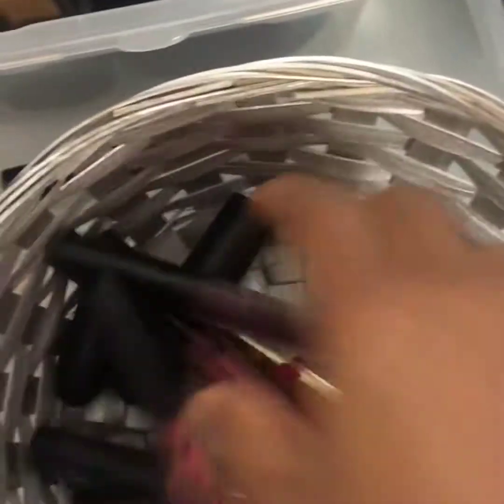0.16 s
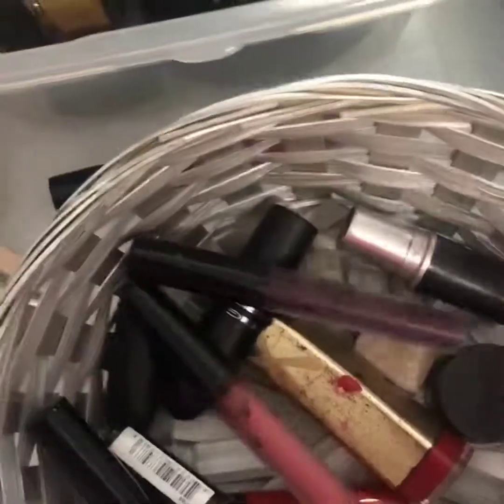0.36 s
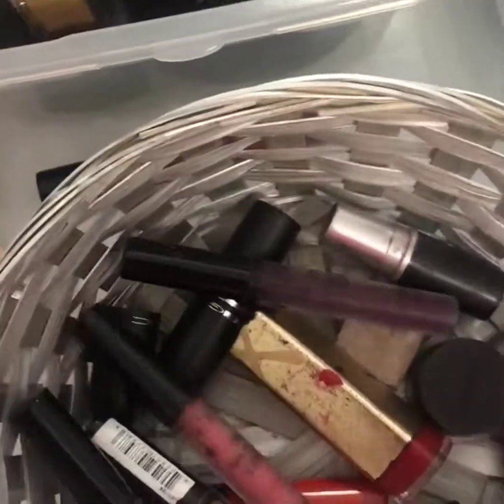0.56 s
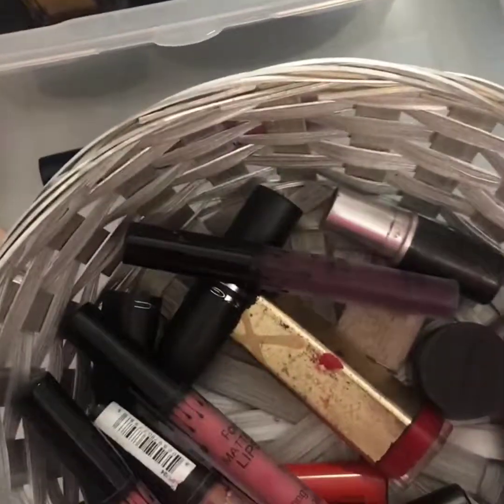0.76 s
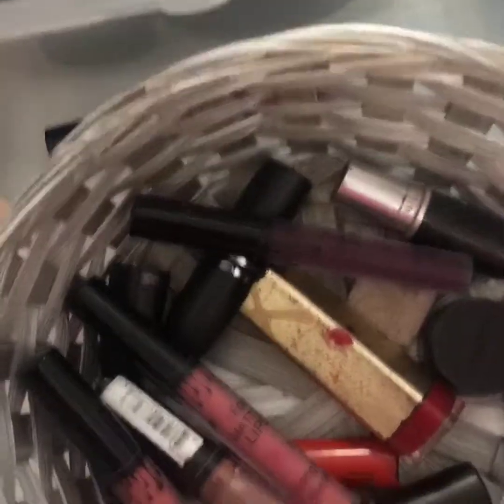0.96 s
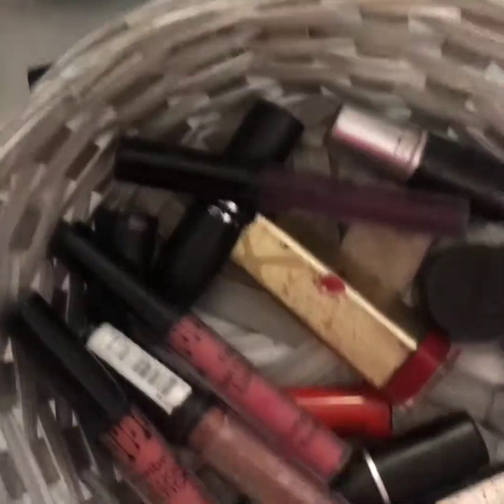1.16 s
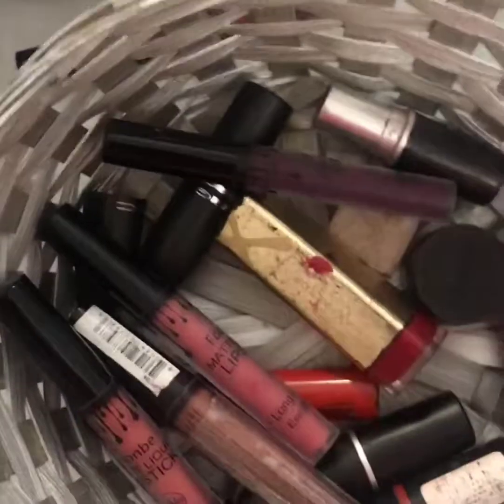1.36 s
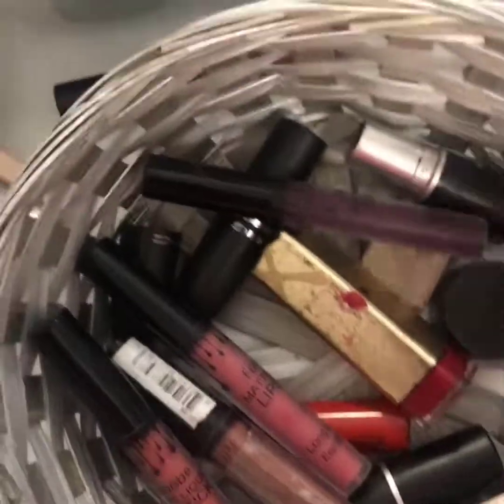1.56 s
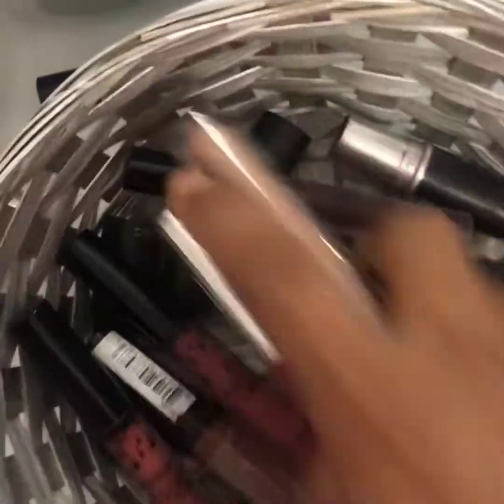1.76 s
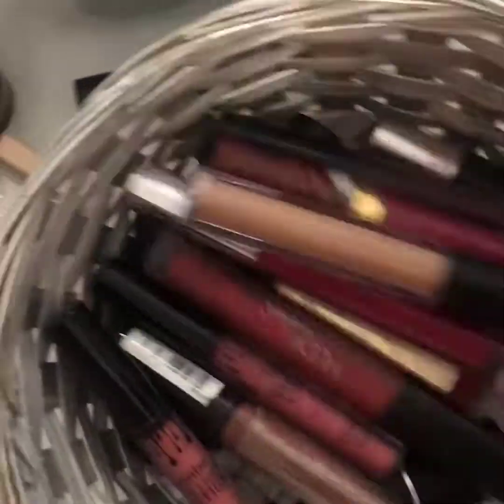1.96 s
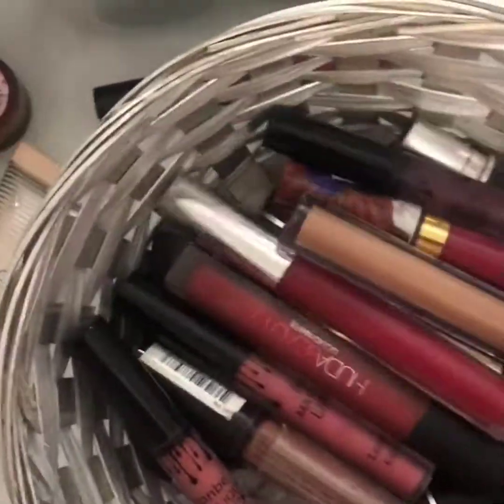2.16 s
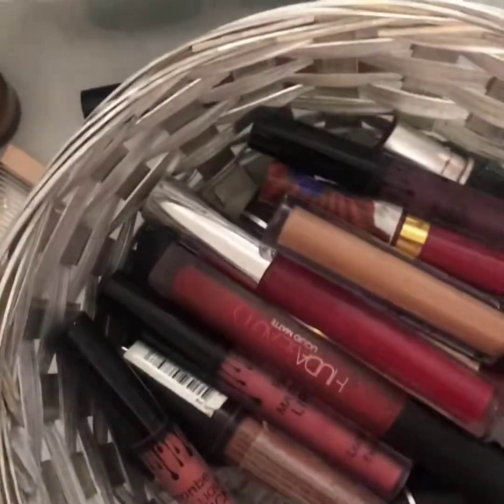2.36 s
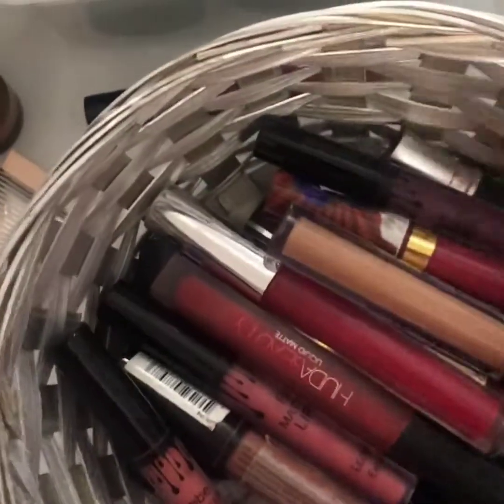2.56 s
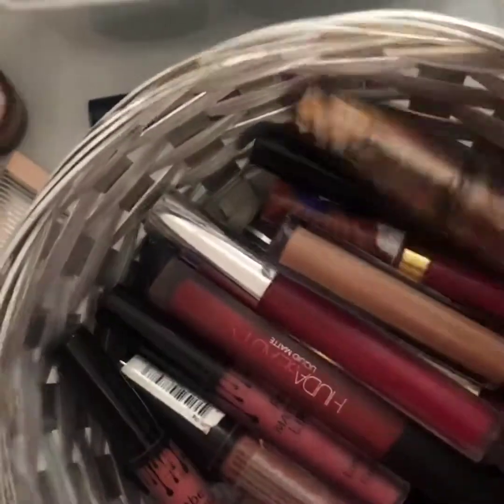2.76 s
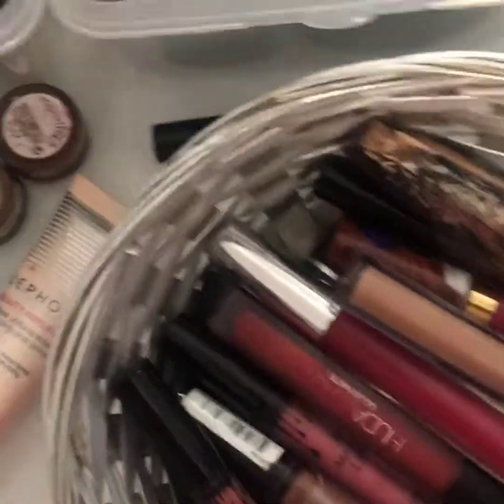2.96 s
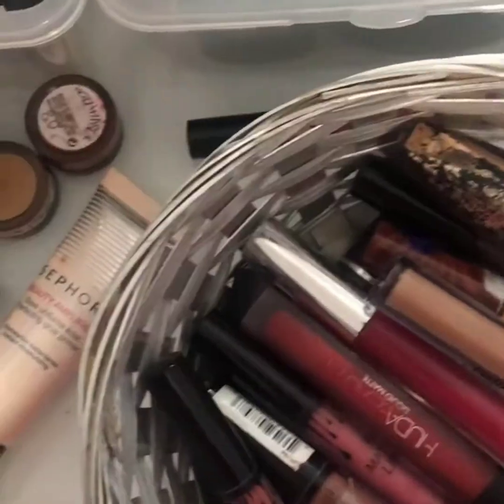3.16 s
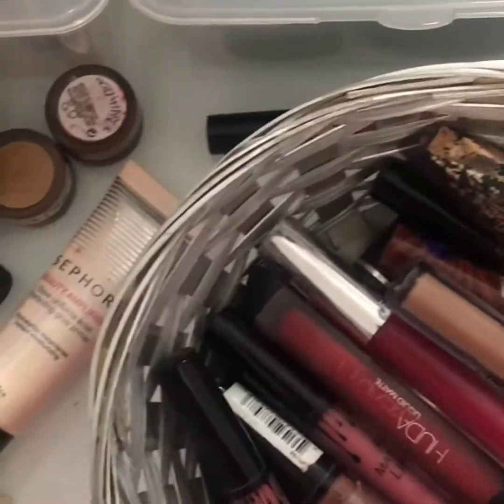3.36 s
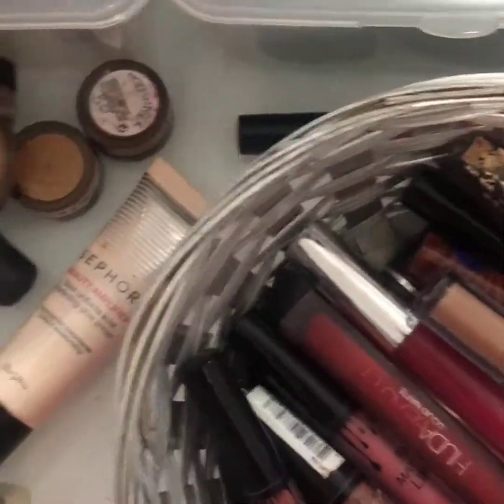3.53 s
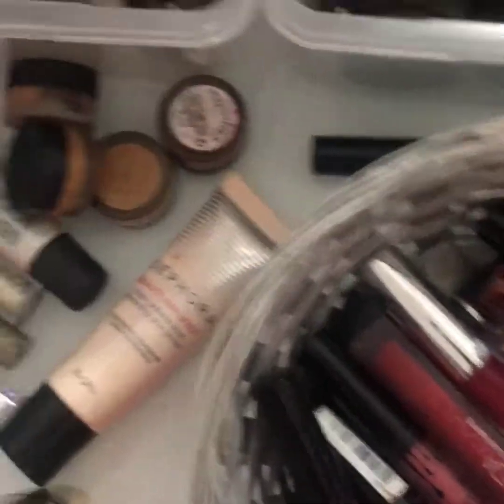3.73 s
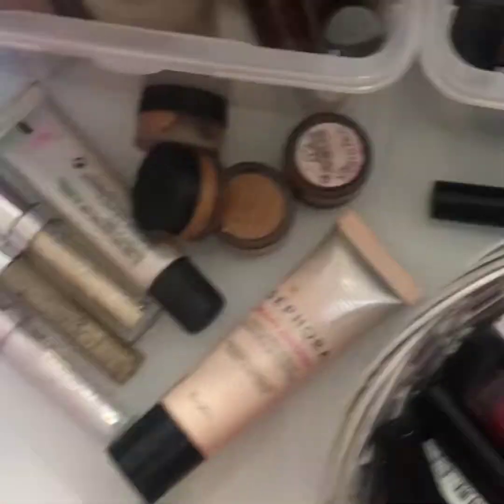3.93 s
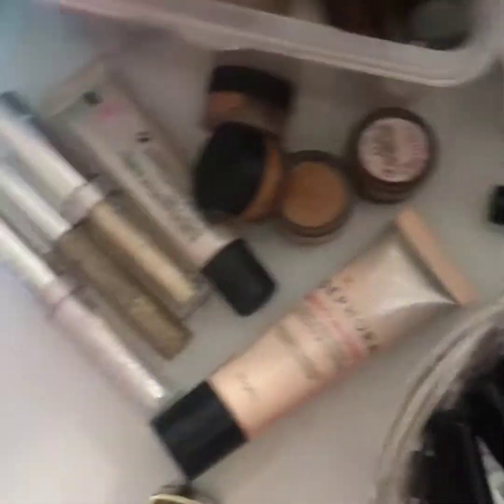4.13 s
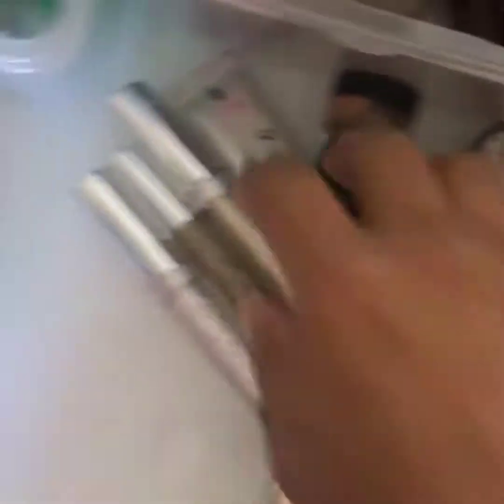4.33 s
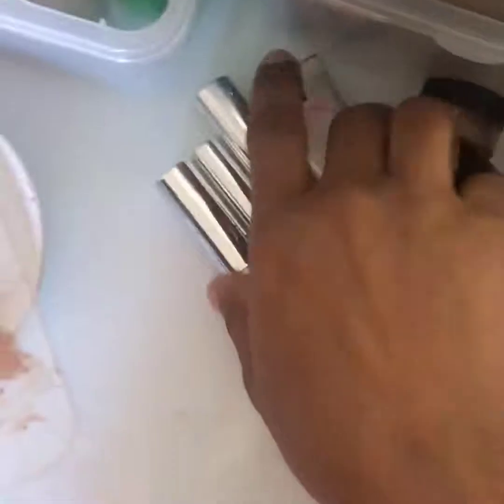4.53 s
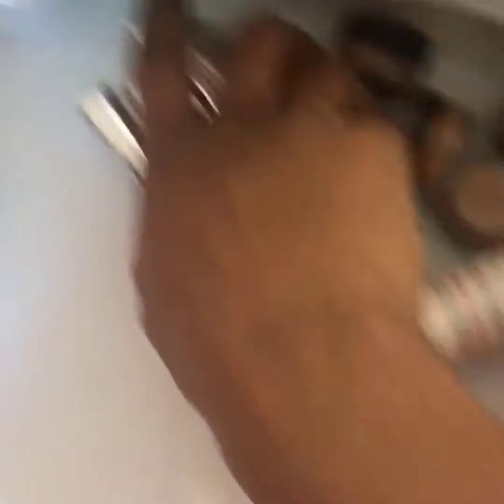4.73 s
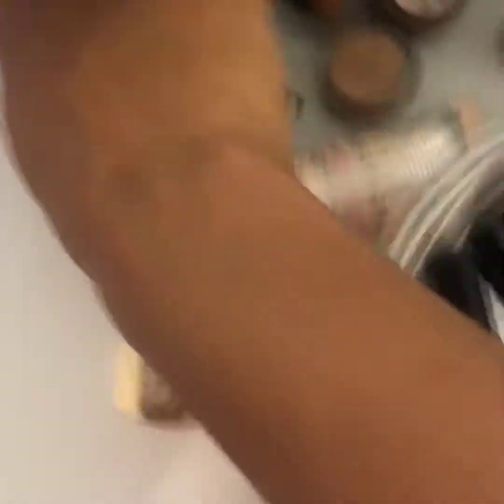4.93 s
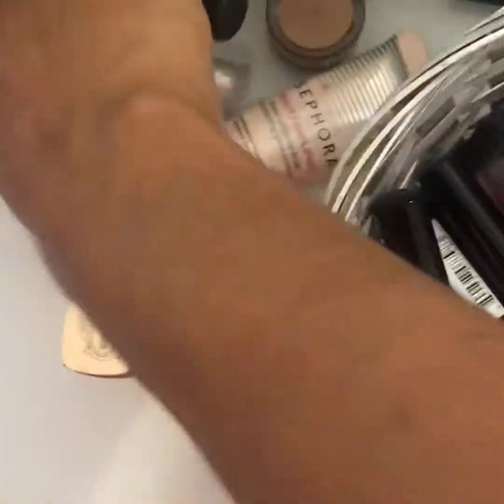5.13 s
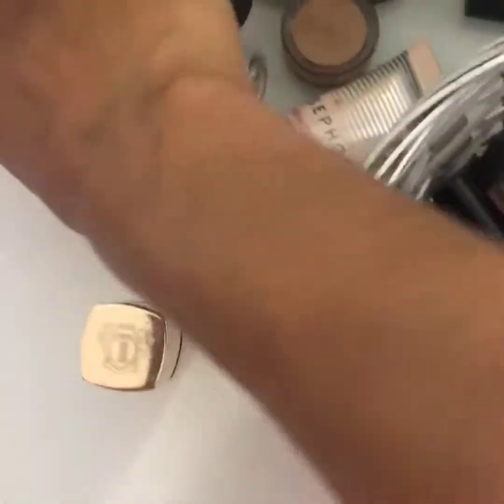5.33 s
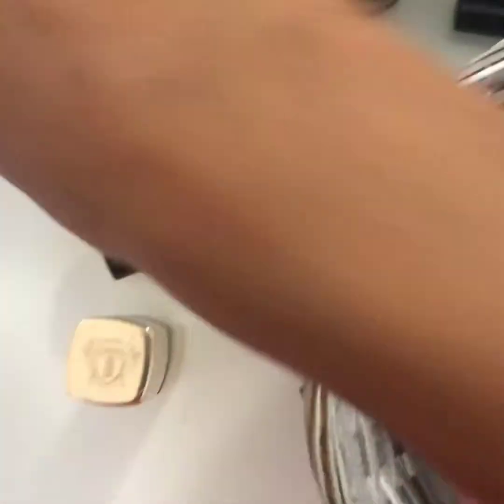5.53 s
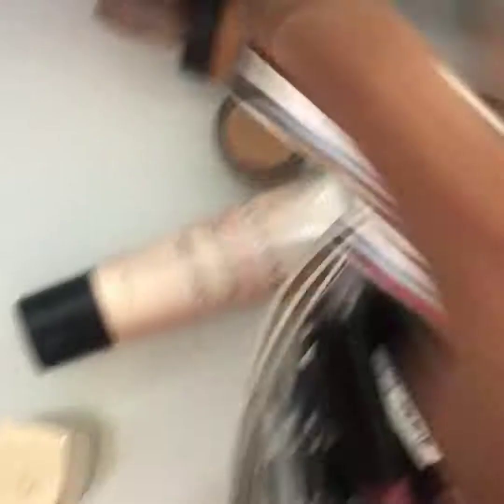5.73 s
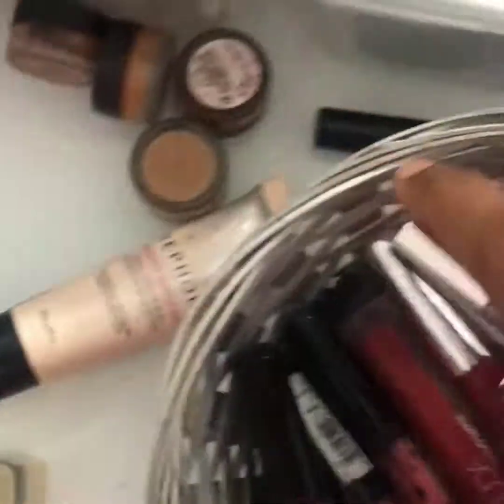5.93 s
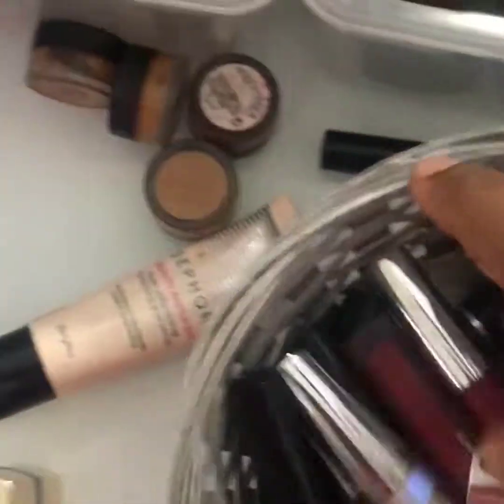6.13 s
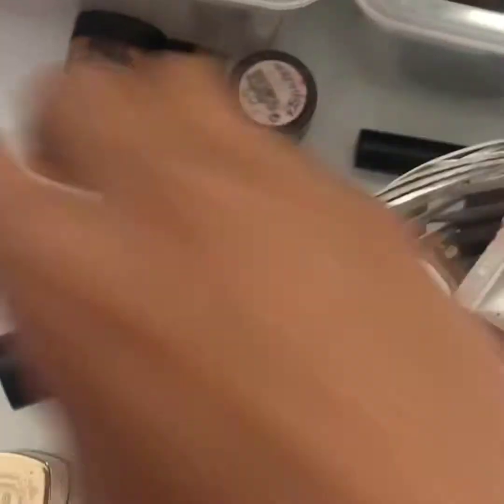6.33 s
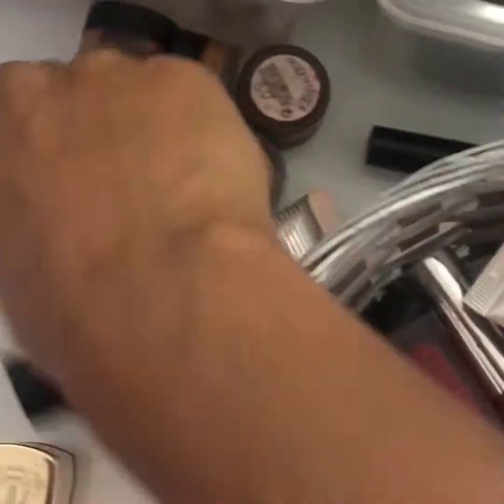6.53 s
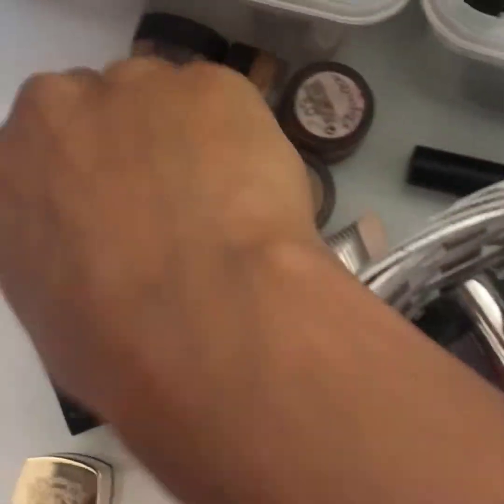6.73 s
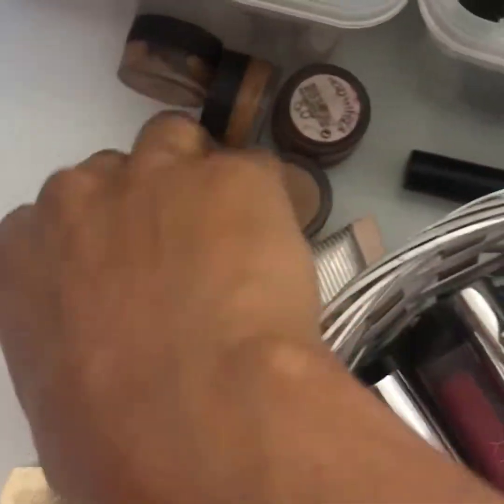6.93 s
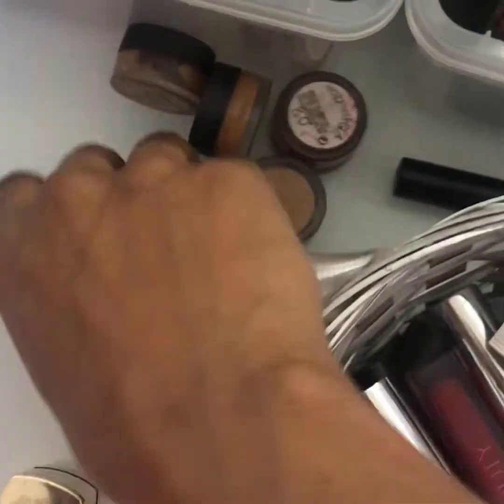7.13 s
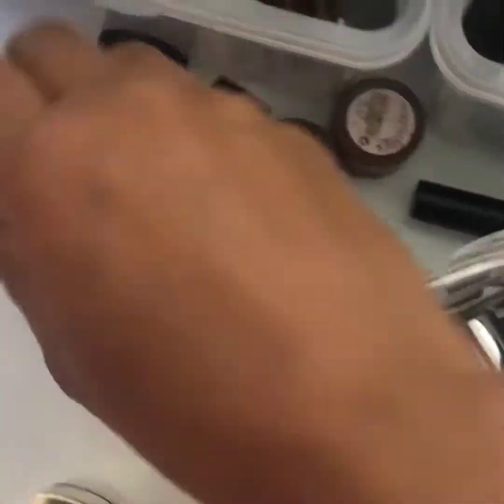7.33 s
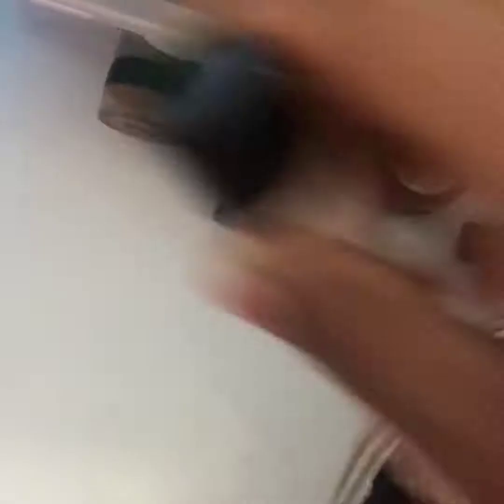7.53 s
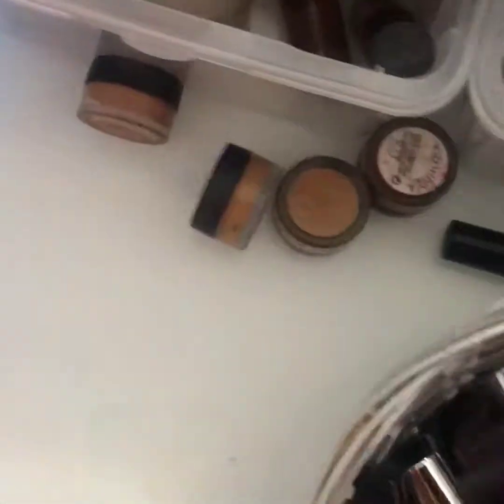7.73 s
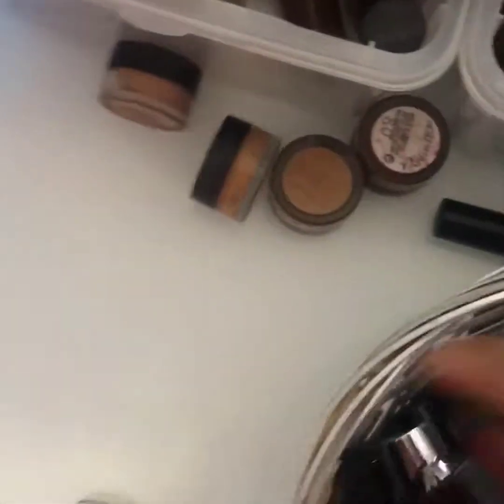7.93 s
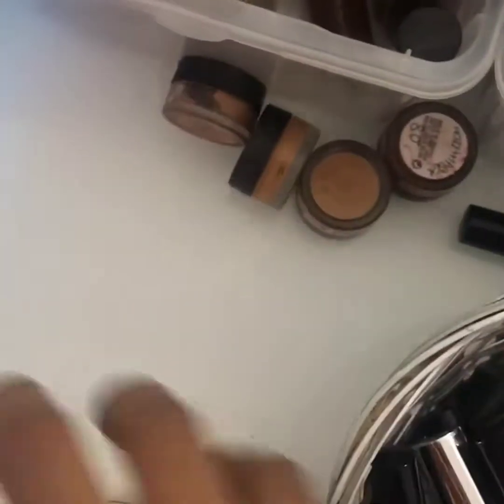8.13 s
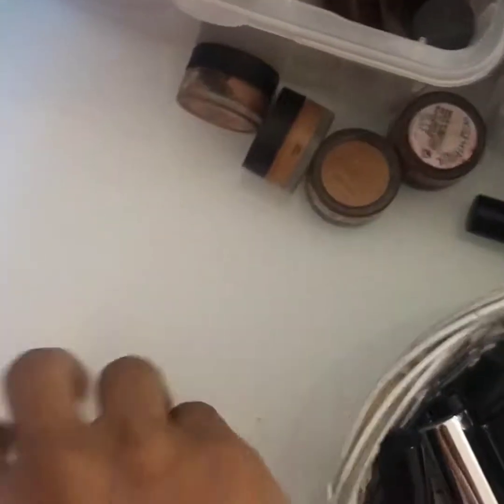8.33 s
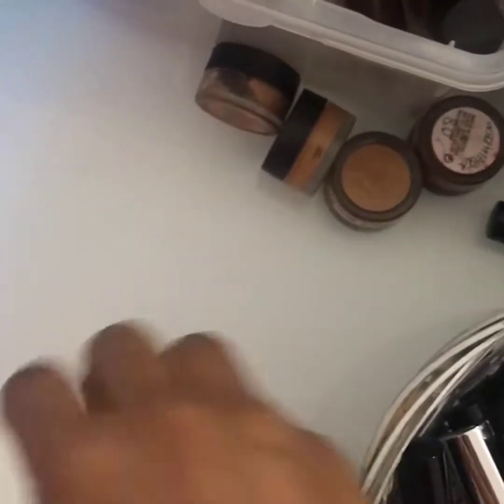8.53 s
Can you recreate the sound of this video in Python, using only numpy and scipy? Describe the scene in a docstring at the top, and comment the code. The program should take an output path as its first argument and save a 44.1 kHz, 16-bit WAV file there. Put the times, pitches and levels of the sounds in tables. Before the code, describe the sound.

Plastic lipstick and gloss tubes click and rattle against each other in a wicker basket from the start, heard close in a small room. More sharp, hollow knocks come around 0.8 to 1.2 seconds, with soft wicker thuds. The loudest handful clatters down at about 1.9 seconds, followed by shorter bursts near 2.8 and 4 seconds, each dying away in a brief rattle. From 4.5 to 5.9 seconds slim tubes slide and knock, quieter and damped, on a drawer bottom, with one bright crack near 4.9. Another handful lands loudly in the basket at about 6.1 seconds. Soft scraping and light taps in the drawer follow until 7.4. The last tubes fall near 7.9 seconds with a low thud, and a few small clicks settle by 8.2. Faint electrical hum and hiss run throughout, the hiss rising briefly after loud cracks.

```python
"""Plastic lipstick and gloss tubes are gathered from a drawer and dropped into a wicker basket.
Over mains hum and hiss in a small room, handfuls clatter for 4 s: each knock rings a hollow tube and
jolts the load into a fading rattle, wood and wicker thud, and the hiss steps up after loud cracks.
From 4.5 s slim gloss tubes slide and knock, damped, on the drawer bottom. A handful lands near 6.1 s,
the hand works quietly in the drawer again, and the last tubes fall near 7.9 s."""
import sys
import numpy as np
from scipy import signal
from scipy.fft import rfft, irfft
from scipy.io import wavfile

SR = 44100
rng = np.random.default_rng(int(sys.argv[2]) if len(sys.argv) > 2 else 0)


def store_wav(level_fs):
    """Save 16-bit WAV to argv[1]."""
    pcm = np.round(np.clip(np.atleast_2d(level_fs), -1, 1) * 32767)
    wavfile.write(sys.argv[1], SR, pcm.T.astype(np.int16))


N = 382788
T = np.arange(N) / SR

# impacts of tube on tube: t/s, relative blow level/dB, tube pitch f/Hz, relative crack level/dB
KNOCKS = [(0.0028, -13.5, 2450, 0), (0.0096, -14, 2660, -11.5), (0.0789, -27.5, 2300, -10),
          (0.1024, -13, 4300, -3), (0.1161, -10.5, 3910, -1), (0.1508, -27.5, 2380, -11),
          (0.162, -16.5, 4110, -2.5), (0.1707, -21.5, 4150, -16), (0.19, -15, 3080, 0),
          (0.208, -21, 2950, -8), (0.2178, -20, 2760, -5.5), (0.2414, -24, 2300, 7.5),
          (0.2453, -10, 2480, -3), (0.2625, -10, 4600, -2.5), (0.2893, -19.5, 4160, -0.5),
          (0.3278, -16.5, 2500, -4), (0.354, -15.5, 4250, 0), (0.3846, -18, 3800, -6),
          (0.5152, -25.5, 4300, -11), (0.588, -31.5, 2340, -15), (0.7891, -29, 2893, -9.5),
          (0.8012, -31.5, 2980, -6), (0.8115, -22, 2600, -16.5), (0.8195, -21.5, 3860, -10.5),
          (0.841, -2, 4070, -15.5), (1.0291, -13.5, 3400, -20), (1.0483, -1.5, 4045, -4),
          (1.0894, -17, 3690, -8.5), (1.1633, -22.5, 1350, -15.5), (1.2058, -22.5, 1270, -46),
          (1.219, -21.5, 3530, -11.5), (1.855, -10, 3580, -4.5), (1.861, -14.5, 3400, -6.5),
          (1.8671, -8.5, 3810, -2), (1.8826, -5, 3220, -4.5), (1.892, -13, 2840, -4.5),
          (1.901, -11.5, 2880, -1.5), (1.9083, -11.5, 2840, -4), (1.9142, -4, 2910, -1.5),
          (1.9315, 0, 3082, -6), (1.9694, -3.5, 4440, -7), (1.988, -16.5, 3390, -1.5),
          (2.0159, -15, 1950, -8.5), (2.0283, -12, 3200, -6.5), (2.049, -15.5, 3720, -11),
          (2.06, -21.5, 2570, -1), (2.0853, -18, 1515, -12), (2.0938, -10, 3900, 4),
          (2.1659, -20.5, 3000, -2.5), (2.1812, -25.5, 1740, -12), (2.8274, -4, 1750, -7.5),
          (2.835, -11.5, 2566, 1.5), (2.844, -14, 3056, -7.5), (2.869, -19, 1565, -9.5),
          (2.9025, -32, 3800, 1), (3.1648, -30.5, 1820, -11.5), (3.9365, -26.5, 1700, -12),
          (3.9453, -18, 3100, 0), (3.953, -10.5, 3500, 5.5), (3.961, -11.5, 1600, -3),
          (4.017, -39, 5600, 2), (4.041, -27, 1620, -0.5), (4.575, -39, 1570, -17),
          (4.5982, -16, 1970, -22), (4.653, -36, 2795, -12), (4.6896, -28.5, 1030, -24),
          (4.714, -42.5, 3000, 0), (4.726, -30, 2280, -25), (4.8357, -31.5, 1540, -12),
          (4.851, -35, 2080, -17), (4.8658, -7.5, 5300, -7.5), (4.8854, -26.5, 5760, 13.5),
          (4.9023, -18.5, 1660, -22), (4.938, -24, 3180, -6.5), (4.967, -27.5, 1560, -13),
          (5.01, -34.5, 1590, -14), (5.1065, -22.5, 2900, -20), (5.15, -27.5, 3300, -24),
          (5.1679, -27.5, 3600, -19), (5.1877, -25.5, 2600, -9.5), (5.219, -28.5, 2300, -4),
          (5.235, -19, 3900, -2.5), (5.5407, -37, 1210, -15), (5.562, -23.5, 3630, -9),
          (5.8446, -46, 2000, -6), (5.9755, -24.5, 1870, -10), (5.9923, -37, 2890, -14.5),
          (6.0563, -13.5, 1870, -6), (6.0623, -21, 2000, -4.5), (6.0718, -19, 2735, -4),
          (6.093, -24, 1510, -15.5), (6.1022, -5, 6220, -9.5), (6.1148, -8, 2180, -2.5),
          (6.1185, -7, 3600, -11), (6.128, -7.5, 4940, -5), (6.15, -6, 4050, -8.5), (6.182, -8, 2400, -6),
          (6.203, -16.5, 1800, -8), (6.21, -12, 4240, 0.5), (6.224, -18.5, 4170, -0.5),
          (6.267, -15, 3420, -9.5), (6.2812, -21, 1930, -12), (6.4161, -28.5, 1850, -15),
          (6.4258, -31, 1440, -11.5), (6.453, -41, 2210, -5), (6.6254, -19.5, 2320, -8.5),
          (6.7596, -27, 2250, -24), (6.999, -39.5, 4000, 0), (7.0868, -37, 2020, 1),
          (7.2235, -29, 3670, -16), (7.267, -27, 1340, -11), (7.285, -27, 1506, -36),
          (7.417, -43.5, 1390, -22.5), (7.873, -34, 2010, -7), (7.881, -15.5, 2096, -1),
          (7.8897, -19, 1830, -4), (7.9056, -18, 4490, 5), (7.9096, -15, 1720, -6),
          (7.9705, -13.5, 1750, -4.5), (8.067, -33.5, 1560, -17), (8.125, -35.5, 2180, -9),
          (8.1568, -22.5, 1860, -5.5), (8.163, -24.5, 2290, 2), (8.177, -29.5, 1970, -20)]
# impacts on basket and drawer bottom: t/s, relative level/dB, f/Hz
THUDS = [(0.115, -32, 396), (0.789, -35, 348), (0.853, -27.5, 335), (1.052, -27.5, 390),
         (1.165, -32.5, 390), (1.213, -33, 335), (1.915, -33, 134.3), (1.991, -32, 151), (2.273, -40, 325),
         (3.167, -47.5, 282.6), (3.953, -36, 188.5), (4.601, -34.5, 343), (4.868, -31.5, 291.3),
         (5.562, -37.5, 330.6), (6.118, -34.5, 137), (6.159, -39, 134), (6.626, -41, 401),
         (7.039, -47, 167.5), (7.101, -42.5, 130.4), (7.266, -31, 428), (7.883, -21.5, 175.2),
         (8.159, -35, 443)]
# tubes sliding under the hand: start t/s, end t/s, friction level/dB, board level/dB
SLIDES = [(0.082, 0.45, -47.5, -58.5), (2.122, 2.333, -71, -66), (3.167, 3.252, -47.5, -62.5),
          (3.351, 3.378, -49, -55.5), (4.53, 4.82, -65.5, -51.5), (4.8, 5.033, -53, -49.5),
          (5.699, 5.93, -67, -68.5), (6.571, 6.671, -65, -47), (6.959, 7.222, -71, -56.5),
          (7.213, 7.367, -67, -56.5)]
# spectrum of room tone and microphone hiss: f/Hz, relative density level/dB
AIR_SPECTRUM = [(41, -43), (70, -11), (148, -9.5), (293, -13.5), (664, -20.5), (1470, -25), (12500, -33),
                (15700, -37), (16100, -51.5)]


def from_db(db):
    return 10 ** (np.asarray(db) / 20)


def unit_rms(x):
    return x / np.sqrt(np.mean(x ** 2) + 1e-20)


def unit_energy(rows):
    return rows / np.sqrt(np.sum(rows ** 2, axis=1, keepdims=True))


def decay(t, t60):
    return from_db(-60 * t / t60)


def at_hz(points, hz):
    """Interpolation along a logarithmic frequency axis."""
    known_hz, values = np.transpose(points)
    return np.interp(np.log(hz + 1), np.log(known_hz), values)


def coloured(x, spectrum):
    """Spectral weighting, scaled to unit rms."""
    hz = np.fft.rfftfreq(len(x), 1 / SR)
    return unit_rms(irfft(rfft(x) * from_db(at_hz(spectrum, hz)), len(x)))


def filtered(x, kind, hz, order=2):
    return signal.sosfilt(signal.butter(order, hz, kind, fs=SR, output="sos"), x)


def band(x, low_hz, high_hz):
    return filtered(x, "band", [low_hz, high_hz])


def placed(times, rows):
    """Superposition of short sounds, one a row, each at its own time."""
    out = np.zeros(N + rows.shape[1])
    for onset, row in zip(times, rows):
        at = max(round(onset * SR), 0)
        out[at:at + len(row)] += row
    return out[:N]


def slide_envelope(levels_db, rise_s=0.03, fall_share=0.12):
    """Friction sounds while motion lasts: each slide rises, holds and falls."""
    out = np.zeros(N)
    for (start, end, *_), level_db in zip(SLIDES, levels_db):
        fall_s = fall_share * (end - start - rise_s)
        out += from_db(level_db) * np.interp(T, [start, start + rise_s, end - fall_s, end], [0, 1, 1, 0])
    return out


def jolt_envelope(blows, gain_db, t60, exponent=0.74):
    """Energy from blows adds up and decays exponentially; hard blows jolt less than in proportion."""
    onsets, blow_db = np.transpose(blows)[:2]
    energy = np.zeros(N)
    energy[(onsets * SR).astype(int)] = from_db(exponent * blow_db + gain_db) ** 2
    return np.sqrt(signal.lfilter([1], [1, -decay(2 / SR, t60)], energy + 1e-18))


def air():
    """Stationary broadband noise: room tone and microphone hiss."""
    return coloured(rng.standard_normal(N), AIR_SPECTRUM)


def hum(mains_hz=49.5, rumble_db=-5.5):
    """Beating: a mains tone interferes with the narrow-band rumble around it."""
    # wavering strength of the hum: t/s, level/dB
    hum_levels = [(0.0, -49), (0.34, -53.5), (0.63, -68), (1.86, -66.5), (2.03, -51.5), (2.39, -65),
                  (3.36, -57), (7.95, -63), (8.68, -71)]
    envelope = from_db(np.interp(T, *np.transpose(hum_levels)))
    rumble = unit_rms(band(band(rng.standard_normal(N), 44, 58), 44, 58))
    return envelope * (np.sqrt(2) * np.sin(2 * np.pi * mains_hz * T) + from_db(rumble_db) * rumble)


def hiss_spells(level_db=-63, threshold_db=-20.5, hold_s=0.41):
    """Gated noise: extra hiss holds for a while after each loud crack."""
    loud_onsets = [onset for onset, blow_db, _, bright_db in KNOCKS if blow_db + bright_db > threshold_db]
    gate = sum((T > onset) & (T < onset + hold_s) for onset in loud_onsets) > 0
    return from_db(level_db) * gate * unit_rms(band(air(), 900, 19000))


def room(x, build_up_s=0.0057):
    """Reverberation: dense reflections act as noise that decays at its own rate in each octave."""
    # reverberation time of the small room: f/Hz, t60/s
    reverb_times = [(100, 0.89), (260, 0.25), (700, 0.33), (1840, 0.27), (4850, 0.26), (12800, 0.018)]
    t = np.arange(SR // 2) / SR
    tail = 0
    for low_hz in 60 * 2. ** np.arange(8):
        octave = band(rng.standard_normal(len(t)), low_hz, 2 * low_hz)
        tail = tail + octave * decay(t, at_hz(reverb_times, np.sqrt(2) * low_hz))
    tail *= np.minimum(t / build_up_s, 1)
    return signal.fftconvolve(x, tail / np.sqrt(np.sum(tail ** 2)))[:N]


def boards(pushes_per_s=45.0, t60=0.21):
    """Forced vibration: basket and drawer bottom grumble under uneven pushes of the moving load."""
    pushes = rng.standard_normal(N) * (0.09 + 3.0 * (rng.random(N) < pushes_per_s / SR))
    grumble = band(pushes, 49, 700)
    by_tubes = slide_envelope(np.transpose(SLIDES)[3]) + jolt_envelope(KNOCKS, gain_db=-38, t60=t60)
    by_thuds = jolt_envelope(THUDS, gain_db=-22, t60=t60)
    return by_tubes * unit_rms(band(grumble, 100, 380)) + by_thuds * unit_rms(band(grumble, 190, 530))


def thuds(t60_cycles=5.8, rise_s=0.0027, gain_db=3.5):
    """Damped free vibration: a soft push sets a board ringing for a few cycles."""
    onsets, level_db, pitch_hz = np.transpose(THUDS)
    t = np.arange(8192) / SR
    cycles = pitch_hz[:, None] * t
    ring = np.sin(2 * np.pi * cycles) * decay(cycles, t60_cycles) * (1 - np.exp(-t / rise_s))
    ring /= np.abs(ring).max(axis=1, keepdims=True)
    return placed(onsets, from_db(level_db + gain_db)[:, None] * ring)


def rattle(ticks_per_s=360.0, uneven_db=4.0, rub_db=1.5, t60_cycles=5.7, split_hz=4700.0, jolt_t60=0.16):
    """Shot noise and friction: small contacts excite tube resonances as the load shakes or slides."""
    # spectral weighting of plastic rattling on plastic: f/Hz, relative level/dB
    rattle_spectrum = [(400, -29), (718, -20.5), (1200, -9), (2400, -11), (10500, -9), (16000, -14.5)]
    # spectral weighting of rubbing on wicker and board: f/Hz, relative level/dB
    scuff_spectrum = [(500, -14.5), (1300, 0), (2700, -7.5), (4300, -4.5), (16000, -26.5)]
    sizes = from_db(uneven_db * np.minimum(rng.exponential(1, N), 2.5)) * rng.choice([-1, 1], N)
    ticks = sizes * (rng.random(N) < ticks_per_s / SR)
    struck_mode = rng.integers(0, 16, N)
    rings = np.zeros(N)
    for k, hz in enumerate(np.geomspace(900, 14000, 16)):
        radius, angle = decay(hz / SR, t60_cycles), 2 * np.pi * hz / SR
        feedback = [1, -2 * radius * np.cos(angle), radius ** 2]
        rings += signal.lfilter([np.sin(angle)], feedback, ticks * (struck_mode == k) + 1e-18)
    grains = coloured(unit_rms(rings + ticks) + from_db(rub_db) * rng.standard_normal(N), rattle_spectrum)
    scuff = coloured(from_db(-rub_db) * unit_rms(rings) + 2 * rng.standard_normal(N), scuff_spectrum)
    bass_db = -28
    treble_db = bass_db + 4.5 + 0.57 * np.transpose(KNOCKS)[3]   # bright knocks leave a bright rattle
    bass = jolt_envelope(KNOCKS, bass_db, jolt_t60) * unit_rms(filtered(grains, "low", split_hz))
    treble = jolt_envelope(KNOCKS, treble_db, jolt_t60) * unit_rms(filtered(grains, "high", split_hz))
    return bass + treble + slide_envelope(np.transpose(SLIDES)[2]) * scuff


def tube_ring(force, t, pitch_hz, t60_scale, scatter, spread_db=2.5):
    """Modal response: the contact force is convolved with the unevenly struck modes of a hollow tube."""
    # modes of a tube: frequency/pitch, relative level/dB, t60/s away from the drawer
    tube_modes = [(.68, -4, .0035), (1.0, 0, .0042), (1.4, -8, .0025), (2.0, -10, .002)]
    response = 0
    for k, (ratio, level_db, t60) in enumerate(tube_modes):
        amplitude = from_db(level_db + spread_db * scatter[:, [k]])
        phase = 2 * np.pi * ratio * pitch_hz[:, None] * t
        response = response + amplitude * np.sin(phase) * decay(t, t60 * t60_scale)
    ring = signal.fftconvolve(force, response, axes=1)[:, :len(t)]
    # little sounds below the lowest mode
    ring = np.array([band(row, 0.5 * hz, 12000) for row, hz in zip(ring, pitch_hz)])
    return unit_energy(filtered(ring, "low", 6300, order=5))   # plastic damps its highest modes at once


def edge_crack(force, t, is_gloss, scatter, cap_hz=9000, cap_t60=0.005, cap_db=-3):
    """Hard contact: edges radiate a bright crack, lower on gloss tubes, and a cap resonates briefly."""
    crack = unit_energy(np.where(is_gloss, band(force, 6000, 10700), band(force, 5400, 15000)))
    glint_hz = cap_hz * from_db(2 * np.tanh(scatter))   # each cap has its own pitch
    cap_mode = np.sin(2 * np.pi * glint_hz * t) * decay(t, cap_t60)
    glint = signal.fftconvolve(crack, cap_mode, axes=1)[:, :len(t)]
    return unit_energy(crack + from_db(cap_db) * unit_energy(glint))


def knocks(typical_rise_s=0.0008, contact_t60=0.017, ring_db=14.0, crack_db=15.5, drawer_db=11.0):
    """Impact excitation: a few ms of uneven contact force drive tube, edges and, in the drawer, board."""
    # spells of work on the drawer bottom, the first with gloss tubes: start t/s, end t/s
    drawer_spells = [(4.5, 5.9), (6.4, 7.8)]
    onsets, blow_db, pitch_hz, bright_db = np.transpose(KNOCKS)
    in_spell = [((onsets > start) & (onsets < end))[:, None] for start, end in drawer_spells]
    in_drawer = sum(in_spell)
    t = np.arange(1024) / SR
    noise, roughness, scatter = rng.standard_normal((len(onsets), 3, len(t))).swapaxes(0, 1)
    rise_s = typical_rise_s * from_db(3 * scatter[:, -1:])   # glancing knocks build up more slowly
    force = noise * np.abs(roughness) * (1 - np.exp(-(t / rise_s) ** 2)) * decay(t, contact_t60)
    t60_scale = np.where(in_drawer, 0.18, 1)   # the drawer bottom damps the tubes
    ring = tube_ring(force, t, pitch_hz, t60_scale, scatter=scatter[:, -2::-1])
    crack = edge_crack(force, t, is_gloss=in_spell[0], scatter=scatter[:, [-8]])
    tubes = from_db(ring_db) * ring + from_db(crack_db + bright_db)[:, None] * crack
    tubes = band(tubes, 720, 21000)   # small tubes radiate little bass
    drawer = in_drawer * from_db(drawer_db) * unit_energy(band(force, 380, 2200))
    return placed(onsets - rise_s[:, 0], from_db(blow_db)[:, None] * (tubes + drawer))


def scene():
    """Superposition of direct sound, reverberation, air and hum."""
    impacts = knocks()
    load = thuds() + rattle() + boards()
    background = from_db(-67) * air()
    reverberation = room(from_db(-14) * impacts + from_db(-12.5) * load)
    return (impacts + load + reverberation + background + hum())[None]


def record(dry):
    """Filtering and saturation: the microphone adds hiss and dips at its port;
    peaks are rounded, and the deepest bass and highest treble are cut off."""
    # dips in the sensitivity of the microphone port: f/Hz, bandwidth/Hz, depth (0-1)
    port_dips = [(7600, 700, .3), (10500, 800, .45)]
    heard = dry + hiss_spells()
    for hz, width_hz, depth in port_dips:
        heard = heard - depth * signal.lfilter(*signal.iirpeak(hz, hz / width_hz, SR), heard)
    rounded = 0.9 * np.tanh(heard / 0.9)
    treble_cut = signal.cheby2(24, 115, 16900, fs=SR, output="sos")
    return signal.sosfilt(treble_cut, filtered(rounded, "high", 40.0, order=3))


dry = scene()
out = record(dry)
store_wav(out)
```